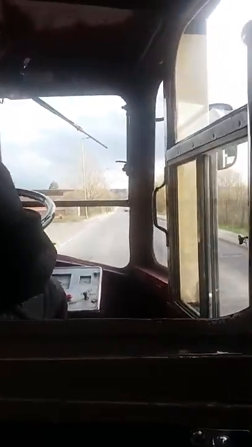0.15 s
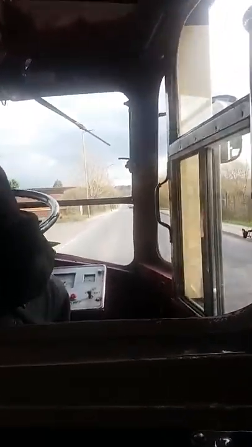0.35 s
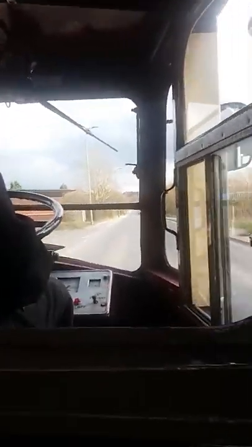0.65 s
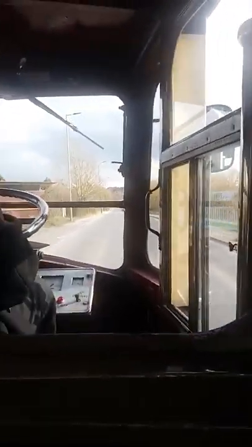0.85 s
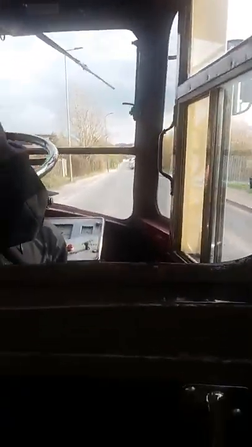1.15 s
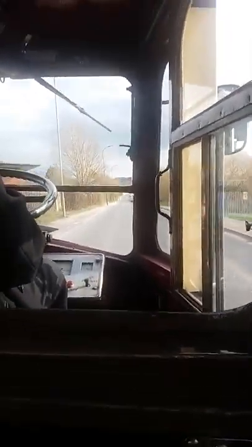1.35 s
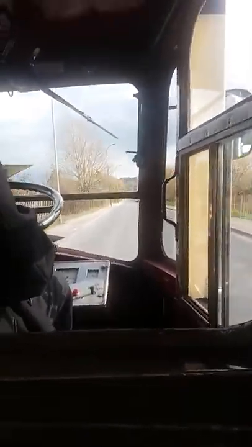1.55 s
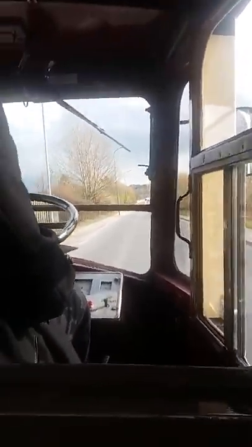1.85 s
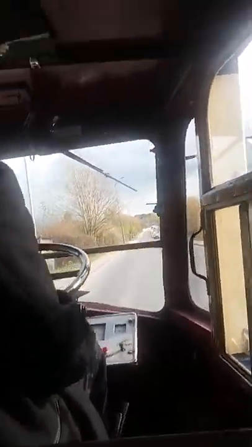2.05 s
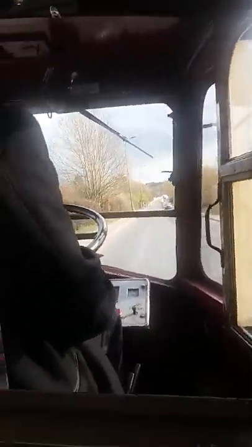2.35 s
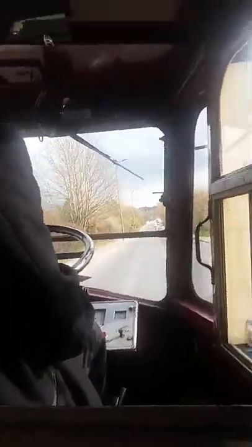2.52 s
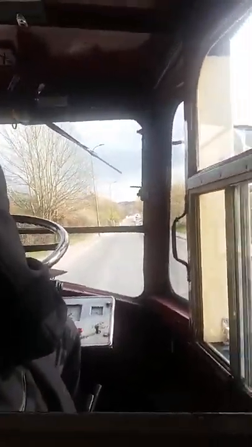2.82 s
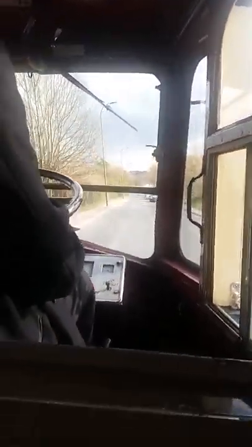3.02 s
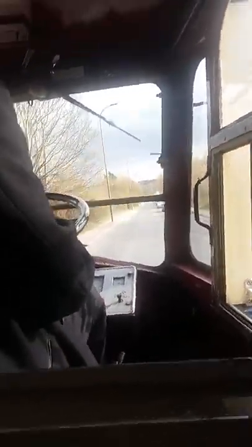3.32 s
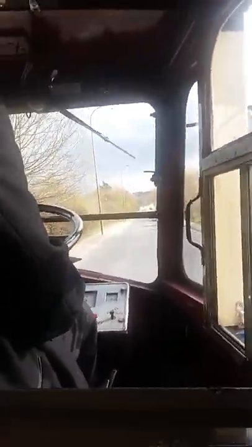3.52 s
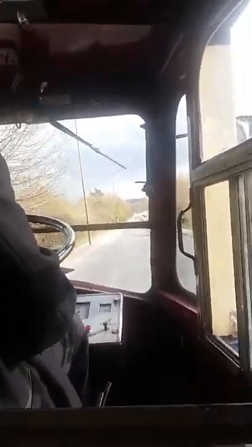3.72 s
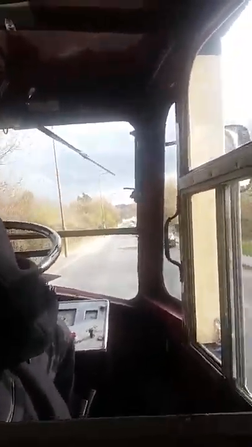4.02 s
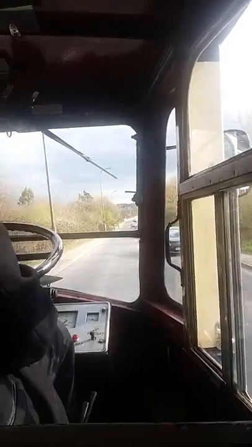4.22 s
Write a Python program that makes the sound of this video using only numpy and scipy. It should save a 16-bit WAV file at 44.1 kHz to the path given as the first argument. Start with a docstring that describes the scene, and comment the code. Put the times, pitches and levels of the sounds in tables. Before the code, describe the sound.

Inside an old bus, a diesel engine drones and knocks, slowly gathering speed over the rumble and rush of the road. Early bumps set loose window fittings rattling. The microphone, just behind the cab, chokes several times, so the sound stutters with soft thuds. The ride then smooths out, until another bump near the end brings back the rattling and the stutter.

```python
"""Inside an old double-decker bus, microphone just behind the cab. From the start the six-cylinder diesel
drones through the body and knocks in its block, slowly gathering speed over the rumble of the road.
Early bumps rattle the loose window fittings; from half a second in, slow swings of cabin pressure choke
the microphone, so the sound stutters with soft thuds. The road smooths out, with one lone choke at 2.3 s,
until another bump near 4 s brings back the rattling and the stutter."""
import sys
import numpy as np
from scipy import signal
from scipy.fft import rfft, irfft
from scipy.io import wavfile
from scipy.ndimage import uniform_filter1d

SR = 44100
rng = np.random.default_rng(int(sys.argv[2]) if len(sys.argv) > 2 else 0)


def master_out(mix):
    """Clip the mix to full scale and print it as 16-bit PCM to the path in sys.argv[1]."""
    frames = np.transpose(np.atleast_2d(mix))
    ceiling = np.clip(frames, -1, 1)
    pcm = np.round(ceiling * 32767).astype(np.int16)
    wavfile.write(sys.argv[1], SR, pcm)


N = 193025
TIME = np.arange(N) / SR
CYLINDERS = 6


def undb(db):
    """Decibels to gain."""
    return 10 ** (np.asarray(db) / 20)


def level(x, db):
    """Scale to an rms level."""
    return x * undb(db) / np.sqrt(np.mean(x ** 2))


def curves(table):
    """Each column of a timed table, sample by sample."""
    time_s, *columns = np.transpose(table)
    return [np.interp(TIME, time_s, column) for column in columns]


def noise():
    """White noise."""
    return rng.standard_normal(N)


def wander(rate_hz):
    """Smooth random motion, rms 1, changing about rate_hz times a second."""
    hz = np.arange(N // 2 + 1) * SR / N
    return level(irfft(rfft(noise()) / (1 + (2 * hz / rate_hz) ** 4), N), 0)


def colour(x, points):
    """Filter by a spectrum of (freq_hz, gain_db) points, rolling off beyond its ends."""
    hz, db = np.transpose(points)
    log_hz = np.log(np.arange(N // 2 + 1) * SR / N + 1)
    outside = np.maximum(np.log(hz[0]) - log_hz, 0) + np.maximum(log_hz - np.log(hz[-1]), 0)
    return irfft(rfft(x) * undb(np.interp(log_hz, np.log(hz), db) - 20 * outside), N)


def ring(x, modes):
    """Drive a set of (pitch_hz, width_hz, gain_db) resonances."""
    return sum(undb(db) * signal.lfilter(*signal.iirpeak(hz, hz / width, fs=SR), x)
               for hz, width, db in modes)


# Low engine tones, coming through the body: multiple_of_cycle, level_db
DRONE_TONES = [(4, -34.5), (5, -30), (6, -22.5), (7, -30.5), (8, -25.5), (9, -31.5), (10, -27.5), (12, -26),
               (14, -28)]
# Gear whines: multiple_of_cycle
GEAR_ORDERS = [24, 28, 39, 43, 44, 51, 53, 66, 80]
# Gear casing resonances that lift a passing whine: pitch_hz, width_hz, centre_level_db
CASING_MODES = [(378.6, 14, -33.5), (462.7, 12, -31), (629.3, 17, -29), (673, 12, -30.5), (718, 9.4, -29.5),
                (774, 12, -23.5), (837.5, 26, -25.5), (1085, 9.9, -32.5), (1245, 20, -29)]
def drone_and_whine(cycle, firing_hz, waver_db=1, drift_rad=0.1):
    """Wavering tones locked to the crankshaft; speed moves the whines through the casing's resonances."""
    tones = [(round(order), undb(db)) for order, db in DRONE_TONES]
    for order in GEAR_ORDERS:
        whine_hz = order * firing_hz / CYLINDERS
        power = sum(undb(db) ** 2 / (1 + (2 * (whine_hz - hz) / width) ** 2)
                    for hz, width, db in CASING_MODES)
        tones.append((order, np.sqrt(power)))
    sound = 0
    for order, rms in tones:
        phase = 2 * np.pi * (order * cycle + rng.random()) + drift_rad * wander(1.5)
        sound += np.sqrt(2) * rms * undb(waver_db * wander(2.4)) * np.sin(phase)
    return sound


def clatter(cycle, harmonics=320):
    """The fine pattern of valve, gear and piston impacts, the same on every engine cycle."""
    grid = np.arange(2 ** 13) / 2 ** 13
    pattern = irfft(np.exp(2j * np.pi * rng.random(harmonics)), len(grid))
    return level(np.interp(cycle, grid, pattern, period=1), 0)


# Knock of each cylinder, in firing order: gain_db
CYLINDER_KNOCKS = [-1.3, -0.33, 1.8, -1.2, -1.3, -0.71]
def diesel_knock(cycle, fresh_db=-9, decay_firings=0.4, sustain=0.7, scatter_db=1):
    """Each firing sets off a burst of impacts, partly repeating and partly new, easing before the next."""
    firing, since_firing = np.divmod(cycle * CYLINDERS, 1)
    firing = firing.astype(int)
    strength = undb(np.array(CYLINDER_KNOCKS)[firing % CYLINDERS] + scatter_db * noise()[firing])
    impacts = clatter(cycle) + 0.3 * wander(1.4) * clatter(cycle) + undb(fresh_db) * noise()
    return strength * (sustain + np.exp(-since_firing / decay_firings)) * impacts


# The engine block, from the passenger side of the bulkhead: freq_hz, gain_db
BLOCK_SPECTRUM = [(150, 9), (260, -2.5), (350, -0.5), (430, -7), (600, 0.5), (780, 2.5), (1100, 1.5),
                  (1500, 0), (1900, -8.5), (2050, -16.5), (2500, -13), (3200, -16.5), (5000, -32.5)]
def engine_block(knocks):
    """The knocks reach the microphone through block and bulkhead, losing their treble."""
    return level(colour(knocks, BLOCK_SPECTRUM), -18.5)


# Ringing engine covers: pitch_hz, width_hz, gain_db
COVER_MODES = [(1673, 38, 3), (1824, 13, 0.5), (1884, 84, 8.5), (2157, 18, 9.5)]
def engine_covers(knocks, cycle, swing_db=1.65):
    """Knocks ring the covers, hardest once every turn of the crankshaft, twice a cycle."""
    shake = undb(swing_db * np.cos(4 * np.pi * (cycle - 1 / 3)))
    drive = colour(knocks * shake, [(1400, 7), (1650, 7), (2000, 1), (2400, -6.5)])
    return level(ring(drive, COVER_MODES), -24.5)


# Cab panels and casings, just ahead of the microphone: pitch_hz, width_hz, gain_db
PANEL_MODES = [(394.7, 5.5, -6), (1183, 13, -4), (1346, 16.5, -2), (1425, 28, -7), (1710, 3, 6.5),
               (1786, 6.3, 2), (1870, 11.6, 0.5), (2310, 6.9, -10)]
def cab_panels(cycle):
    """A panel sings whenever an engine harmonic passes through its narrow resonance."""
    return level(ring(clatter(cycle), PANEL_MODES), -24)


# Engine speed, a steady climb with one brief sag: time_s, firing_hz
ENGINE_SPEED = [(0.0, 93.15), (3.0, 97.95), (3.3, 98.8), (3.55, 98.24), (4.1, 99.4), (4.38, 99.47)]
# How hard the engine pulls: time_s, knock_gain_db, cover_gain_db
ENGINE_PULL = [(0, 1, -3), (.4, 1.5, -5), (.9, 0.5, 1.5), (1.8, 0, 4.5), (2.3, 2, 3.5), (2.85, -1.5, 2.5),
               (3.2, -2, -1.5), (4.38, 1.5, -0.5)]
def engine():
    """The diesel at close range: one crankshaft drives the tones, block, covers and panels."""
    firing_hz, = curves(ENGINE_SPEED)
    knock_db, cover_db = curves(ENGINE_PULL)
    cycle = np.cumsum(firing_hz) / SR / CYLINDERS  # four-stroke cycles elapsed
    tones = drone_and_whine(cycle, firing_hz)
    knocks = diesel_knock(cycle)
    block_and_panels = (engine_block(knocks) + cab_panels(cycle)) * undb(knock_db)
    return tones + block_and_panels + engine_covers(knocks, cycle) * undb(cover_db)


# Road rumble from under the floor: freq_hz, gain_db
RUMBLE_SPECTRUM = [(20, -7), (42, 0.5), (65, -2), (110, 5), (160, -3.5), (220, -1.5), (290, -13.5),
                   (500, -20), (1000, -49)]
# Tyres, fan and air, all round the cabin: freq_hz, gain_db
RUSH_SPECTRUM = [(150, -16), (350, 1.5), (800, 4.5), (1800, 1), (2200, -2.5), (3100, -10.5), (4200, -14),
                 (5300, -23), (8000, -28.5), (10000, -34), (13000, -38), (16000, -49)]
def road(shake, smooth_db=-1, bump_rise_db=5):
    """Low rumble through the body, swelling on bumps, and a steadier rush of tyres and air."""
    rumble = level(colour(noise(), RUMBLE_SPECTRUM), -20.5) * undb(smooth_db + bump_rise_db * shake)
    rush = level(colour(noise(), RUSH_SPECTRUM), -19.5) * undb(0.43 * wander(12))
    return rumble + rush


# A window frame in the cabin: time_s, level_db
FRAME_BUZZ = [(0, -42), (.68, -36), (.9, -39), (1.0, -49), (1.8, -58), (3.0, -43.5), (4.38, -40)]
def window_buzz(flutter_db=2):
    """A shaken window frame buzzes thinly near 4 kHz."""
    buzz_db, = curves(FRAME_BUZZ)
    band = ring(ring(noise(), [(3980, 900, 0)]), [(4020, 830, 0)])
    return level(band, 0) * undb(buzz_db + flutter_db * wander(50))


# Bumps passing under the wheels: centre_s, half_length_s, strength
ROAD_BUMPS = [(0.034, .2, 0.86), (0.67, 0.21, 0.83), (1.44, 0.4, 1), (4.09, 0.35, 0.72)]
def body_shake():
    """How hard the body shakes: each bump swells and dies away."""
    return sum(strength * np.exp(-((TIME - centre_s) / half_s) ** 2)
               for centre_s, half_s, strength in ROAD_BUMPS)


# The sharpest taps of the window fittings: start_s, gain_db
FITTING_TAPS = [(0.0333, -32), (0.0667, -30), (0.0944, -31), (0.168, -33), (0.1955, -27), (0.2294, -32),
                (0.4359, -26), (0.5931, -21), (0.7357, -32), (0.752, -25), (0.7804, -26), (1.0844, -30),
                (1.2111, -31), (1.489, -22), (1.5948, -21), (2.3054, -26), (4.3256, -27)]
# Their bright ring, heard inside the cabin: freq_hz, gain_db
FITTING_SPECTRUM = [(2500, -10), (4200, 11.5), (5500, 4), (7800, 5), (10000, 0), (12500, -7), (15500, -16)]
def window_rattles(shake, smooth_db=-4.5, bump_rise_db=13, tap_db=-6.5, decay_s=0.0053, count=500):
    """Loose fittings strike in short bright bursts: sharp taps over a chatter that grows on bumps."""
    taps, chatter = np.zeros(N), np.zeros(N)
    for start_s, db in FITTING_TAPS:
        taps[int(start_s * SR)] = undb(db + tap_db)
    chatter[rng.integers(0, N, count)] = undb(rng.normal(-46.5, 5, count))
    chatter *= undb(smooth_db + bump_rise_db * shake)
    envelope = signal.lfilter([1], [1, -np.exp(-1 / (decay_s * SR))], taps + chatter)
    return envelope * level(colour(noise(), FITTING_SPECTRUM), 0)


def scene():
    """The cabin just behind the cab, in mono: the engine pulls on; bumps lift both rumble and chatter."""
    shake = body_shake()
    windows = window_rattles(shake) + window_buzz()
    return (engine() + road(shake) + windows)[None]


# Swings of cabin pressure, right at the diaphragm: start_s, end_s, thud_gain_db
PRESSURE_SWINGS = [(0.475, .482, -22), (0.559, .571, -1), (.606, 0.625, -2.5), (0.663, 0.671, -23),
                   (.939, 0.95, -9), (1.233, 1.252, -7.5), (1.286, 1.305, -6), (1.327, 1.342, -16),
                   (1.375, 1.399, -1.5), (1.413, 1.428, 0.5), (1.462, 1.486, -1), (1.501, 1.53, -5),
                   (1.553, 1.587, 2), (1.608, 1.638, -0.5), (1.662, 1.693, -7), (1.718, 1.744, -4.5),
                   (2.282, 2.299, -6), (3.831, 3.844, -42), (3.884, 3.902, -5), (3.924, 3.945, -17),
                   (3.977, 4.0, -17), (4.02, 4.042, -9), (4.075, 4.104, -4.5), (4.139, 4.146, -10)]
def microphone_choke(x, depth_db=-59.5, thud_db=0.5, full_press_s=0.024):
    """A pressure swing pins the diaphragm: the sound drops out, and the jolt against the stop thuds."""
    shut_db, jolts = np.zeros(N), np.zeros(N)
    for start_s, end_s, db in PRESSURE_SWINGS:
        length_s = end_s - start_s
        progress = np.clip((TIME - start_s) / length_s, 0, 1)
        arch = 4 * progress * (1 - progress)
        pressure = min(length_s / full_press_s, 1) * arch  # longer swings press harder
        shut_db += depth_db * np.sqrt(pressure)
        jolts -= undb(thud_db + db) * (progress > 0) * (1 - progress) ** 2
    thuds = signal.sosfilt(signal.butter(3, 260, fs=SR, output="sos"), jolts)
    return x * uniform_filter1d(undb(shut_db), size=24) + thuds


def record(dry, bass_hz=50, top_hz=15900):
    """The microphone chokes, its bass filter rings after each thud, and the top is cut."""
    bass_cut = signal.butter(6, bass_hz, "highpass", fs=SR, output="sos")
    top_cut = signal.ellip(10, 0.2, 80, top_hz, fs=SR, output="sos")
    picked_up = signal.sosfilt(bass_cut, microphone_choke(dry))
    return signal.sosfilt(top_cut, np.clip(picked_up, -1, 1))


dry = scene()
out = record(dry)
master_out(out)
```